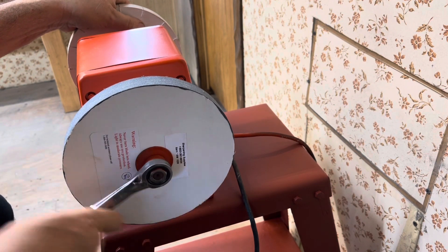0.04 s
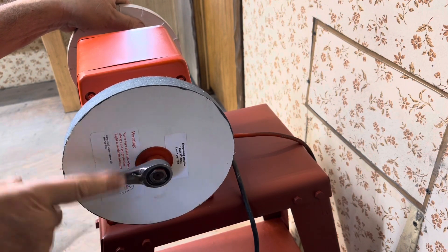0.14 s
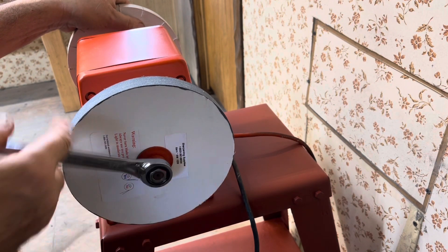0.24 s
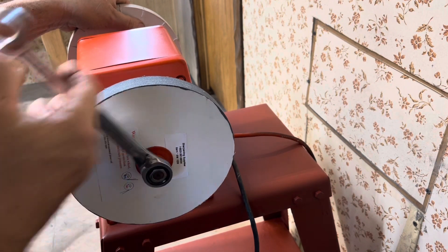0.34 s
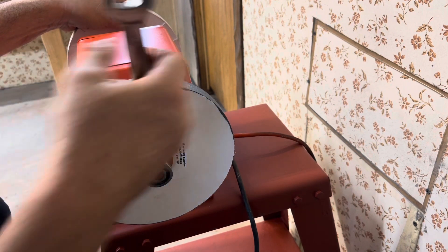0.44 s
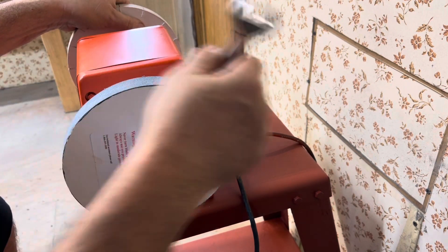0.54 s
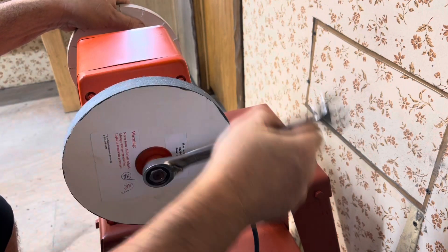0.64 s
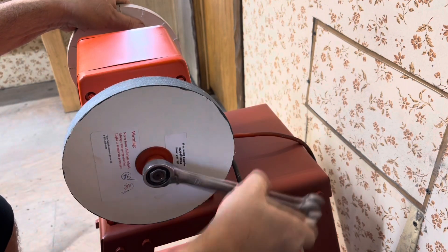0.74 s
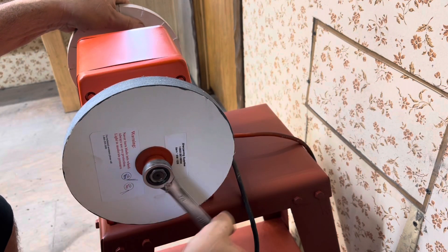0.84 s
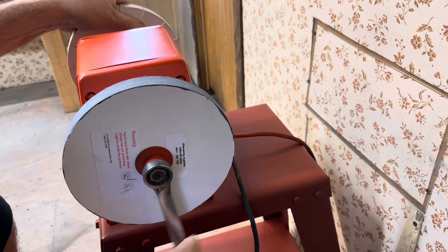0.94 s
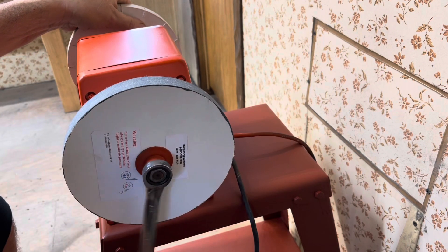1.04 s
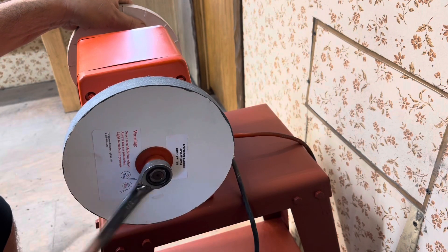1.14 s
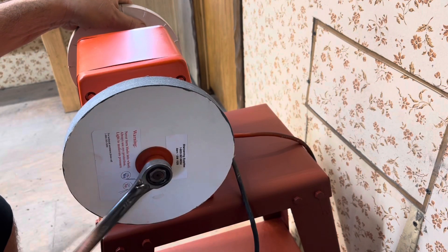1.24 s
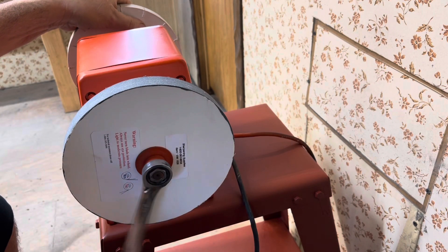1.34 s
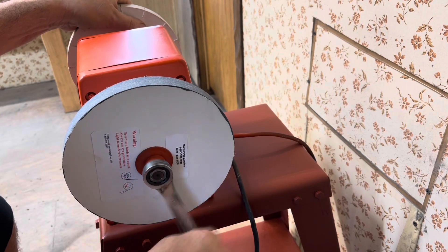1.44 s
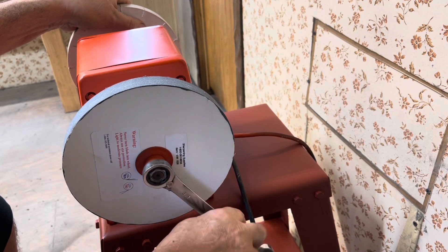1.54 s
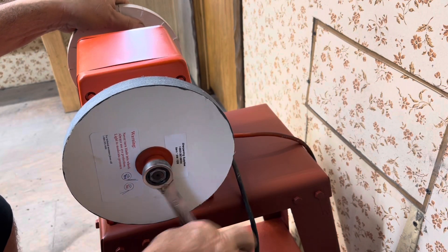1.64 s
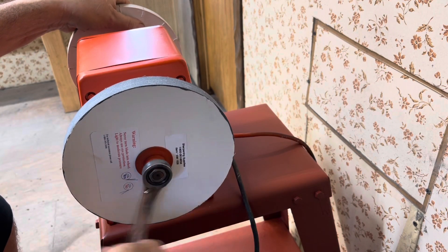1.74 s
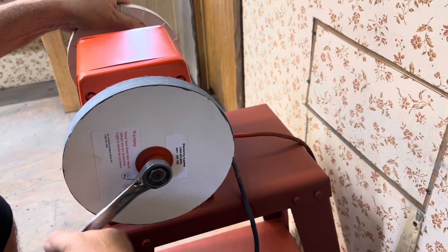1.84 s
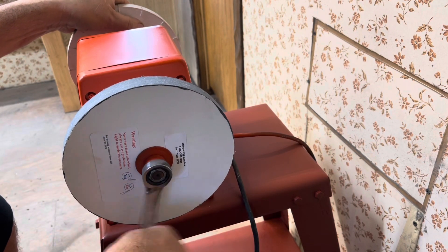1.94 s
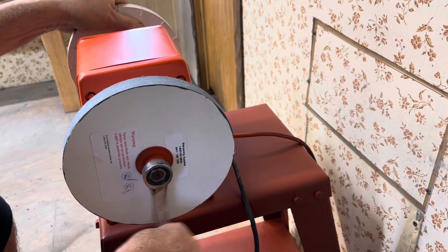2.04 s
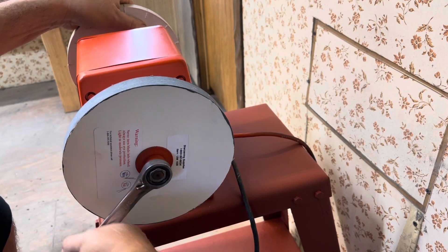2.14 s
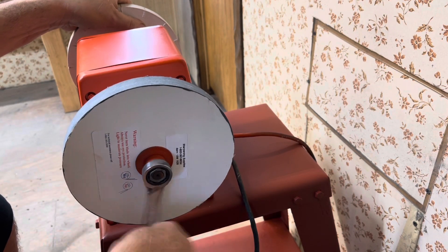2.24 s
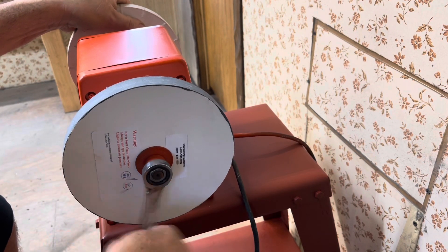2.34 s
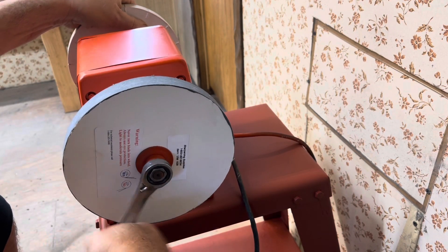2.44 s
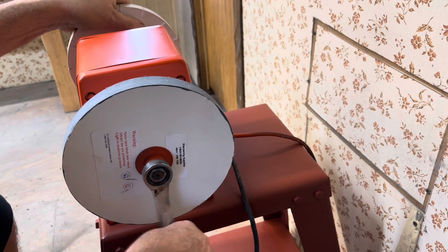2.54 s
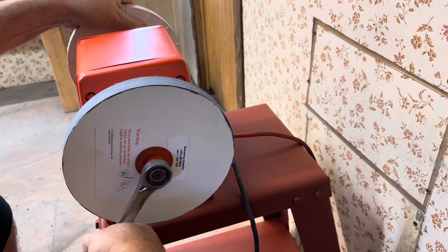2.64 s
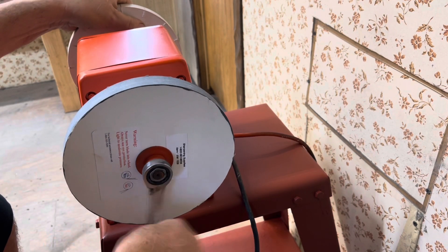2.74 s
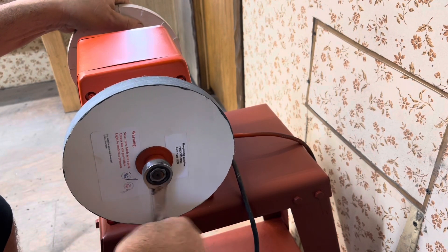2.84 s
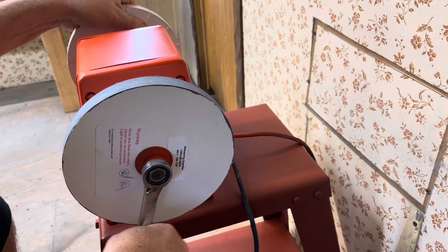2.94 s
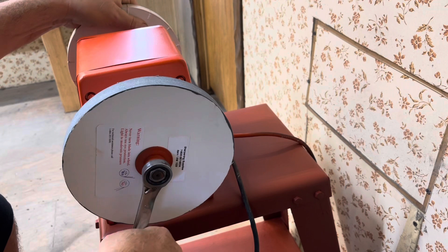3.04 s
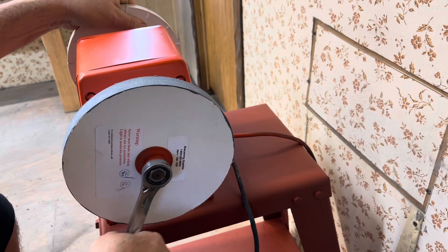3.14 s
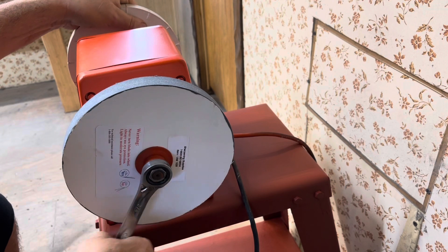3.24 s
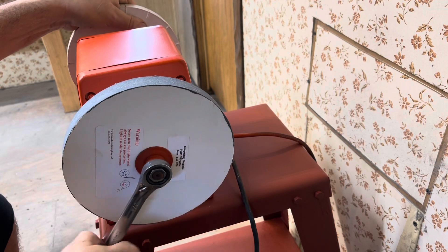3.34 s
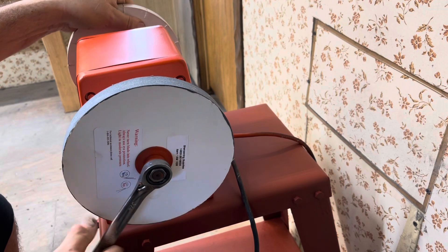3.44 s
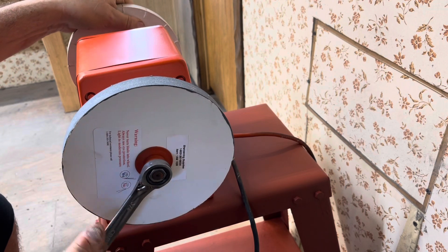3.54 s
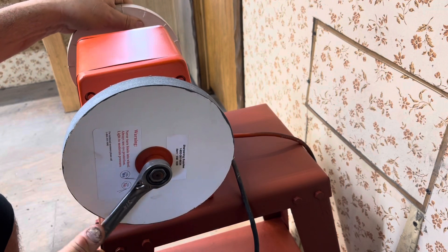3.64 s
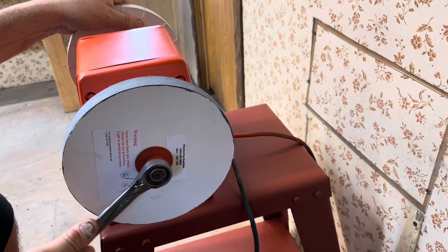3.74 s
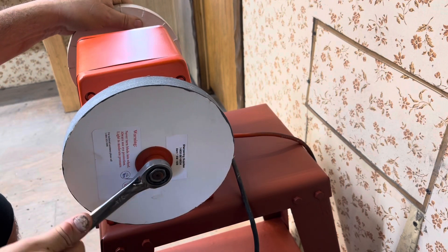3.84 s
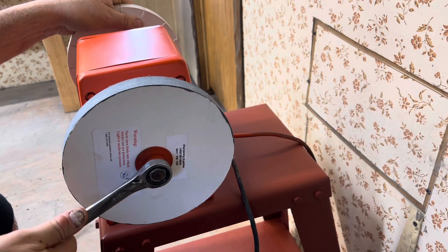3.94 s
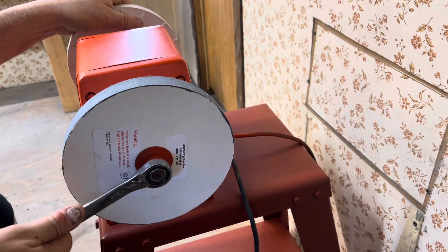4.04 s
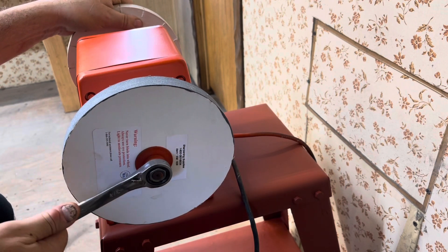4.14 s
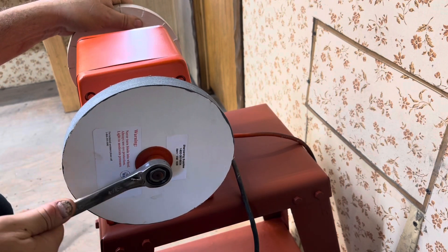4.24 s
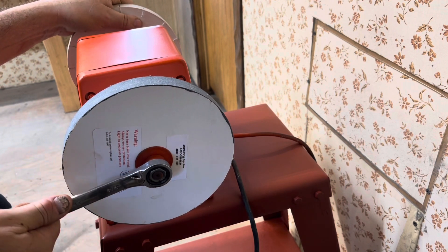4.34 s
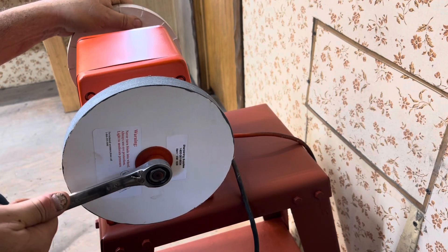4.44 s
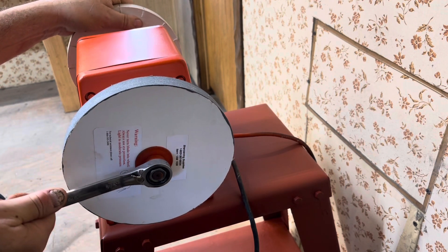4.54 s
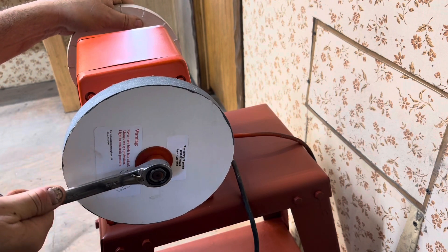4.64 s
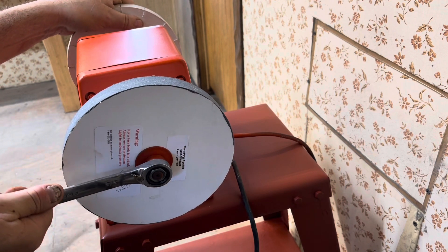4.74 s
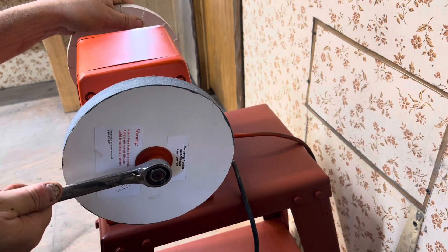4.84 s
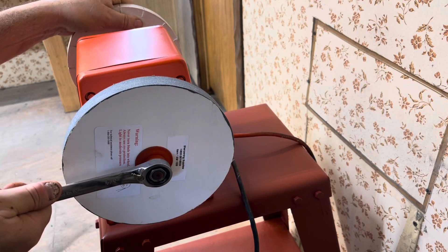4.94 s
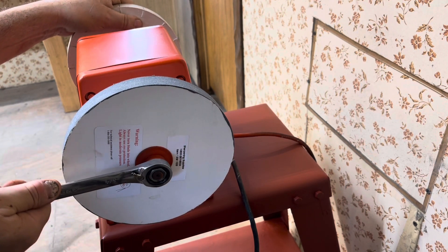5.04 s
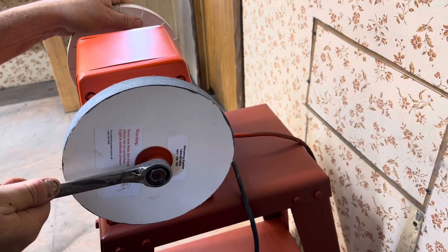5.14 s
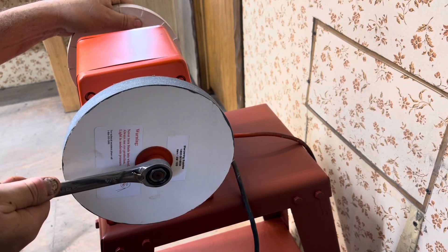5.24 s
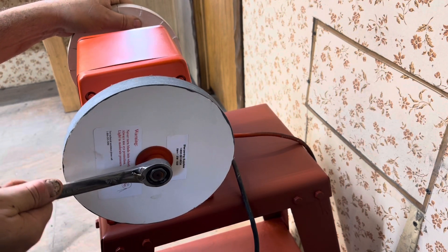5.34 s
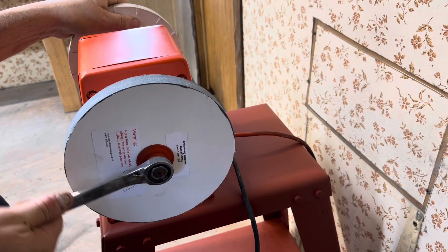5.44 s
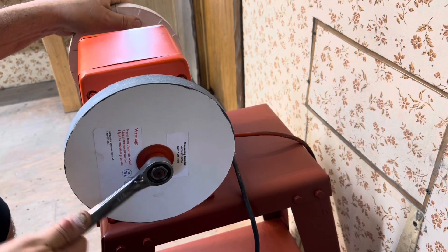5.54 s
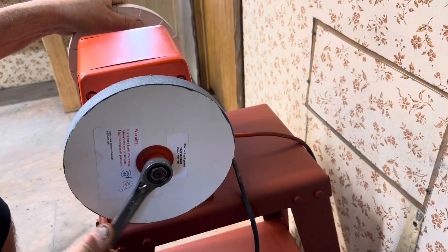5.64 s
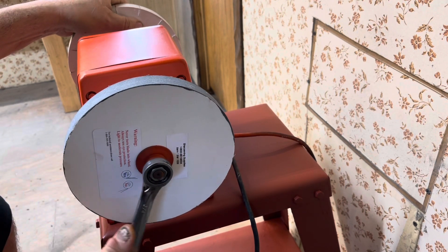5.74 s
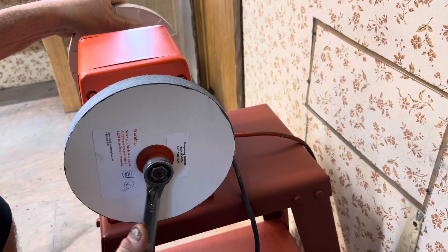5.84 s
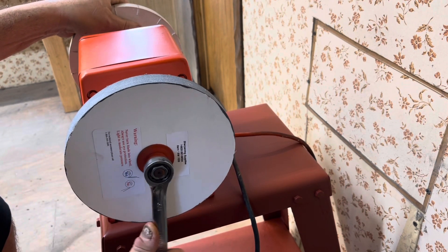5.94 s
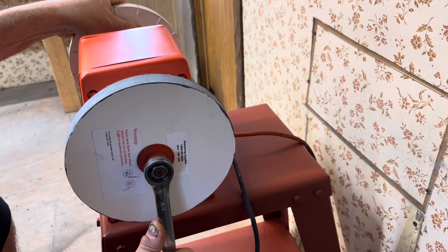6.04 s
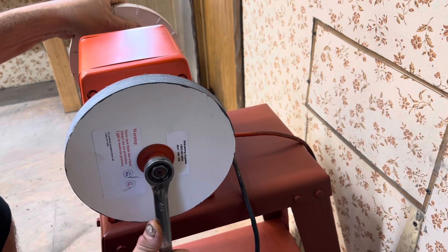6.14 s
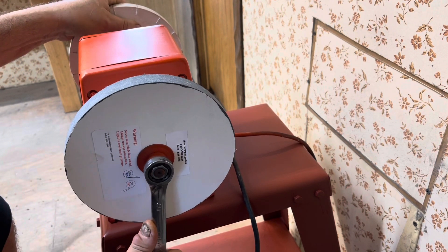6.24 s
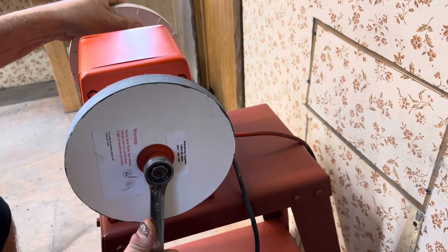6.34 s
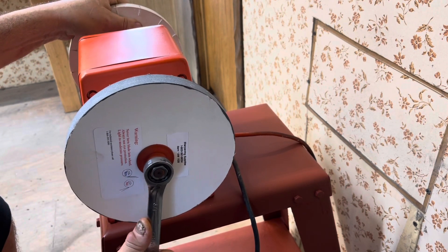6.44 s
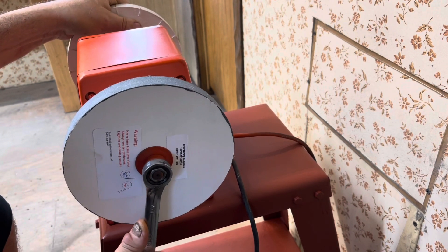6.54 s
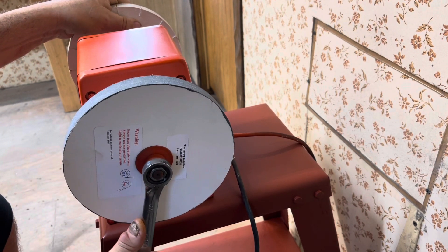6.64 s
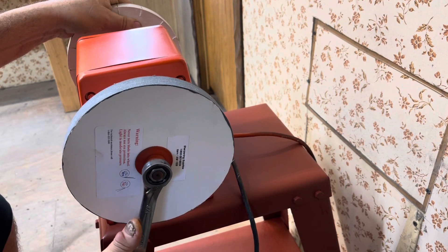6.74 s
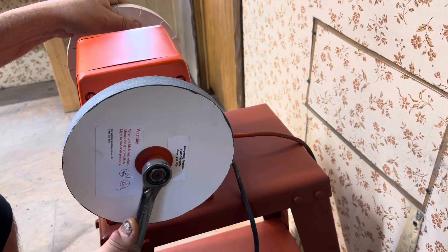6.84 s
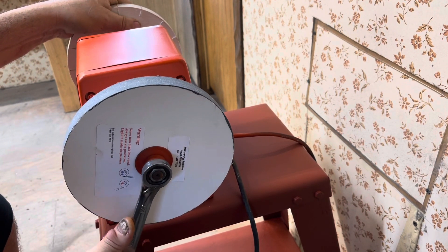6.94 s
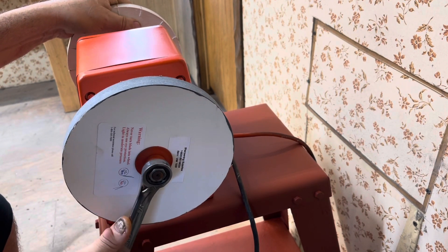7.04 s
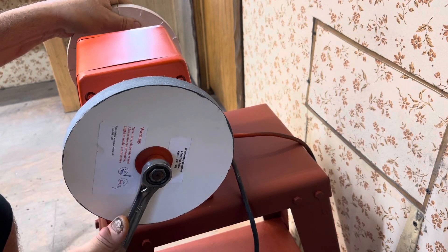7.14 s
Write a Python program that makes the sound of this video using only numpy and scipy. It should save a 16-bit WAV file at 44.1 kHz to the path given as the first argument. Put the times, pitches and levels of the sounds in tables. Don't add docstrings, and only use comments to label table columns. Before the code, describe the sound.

Five fast ratchet swings snap and scrape against a thumping metal stand, followed by near quiet and one slower, ringing run of separate clicks.

```python
import sys
import numpy as np
from scipy import signal
from scipy.fft import rfft, irfft, next_fast_len
from scipy.io import wavfile
from scipy.ndimage import uniform_filter1d

SR = 44100
rng = np.random.default_rng(int(sys.argv[2]) if len(sys.argv) > 2 else 0)


def volts_from_db(level):
    exponent = np.asarray(level, float) / 20
    return 10 ** exponent


def pcm_store(signal):
    levels = np.round(np.clip(np.atleast_2d(signal), -1, 1) * 32767)
    wavfile.write(sys.argv[1], SR, levels.astype(np.int16).T)


N = 316638

# centre_hz, width_hz, level_db
FRAME_RINGS = [(532, 57, -3), (610, 68, -2), (704.6, 40, -3.5), (890.7, 91, -2.5), (1035, 130, -7),
               (1240, 150, -12), (1400, 77, -8.5), (1650, 67, -15.5)]
# centre_hz, width_hz, level_db
SHELF_RINGS = [(263, 83, -5.5), (331, 50, 0.5), (402.4, 59, -3)]
# start_s, shelf_shake_db, frame_minus_shelf_db, sway_db (under 200 Hz), scrape_db
PULLS = [(0.0, -50.5, -10.5, -40.5, -65), (0.288, -49, -16, -47, -62.5), (0.79, -53, -19.5, -43, -70),
         (1.0, -59.5, -10, -49.5, -59.5), (1.27, -44.5, -12, -46, -61.5), (1.325, -45, -14, -42, -42.5),
         (1.47, -47, -2.5, -52.5, -41.5), (1.625, -39.5, -21.5, -48, -49), (1.9, -41.5, -8.5, -46.5, -43),
         (2.05, -42.5, -1.5, -50, -44.5), (2.208, -37.5, -1.5, -40, -39.5), (2.349, -42, -5, -43, -45.5),
         (2.49, -41.5, 4.5, -41, -45.5), (2.58, -49, 1.5, -40, -55), (2.74, -43.5, 9.5, -41, -45.5),
         (2.848, -44.5, 0, -33, -54.5), (5.404, -66, 6.5, -52, -65), (5.505, -50, 12, -35, -47.5),
         (5.62, -54.5, 14, -50.5, -44.5), (5.76, -57, 14, -55, -42.5), (5.93, -56.5, 12, -43.5, -38),
         (6.07, -61.5, 13, -49.5, -48), (6.57, -68.5, -23, -40.5, -72), (6.7, -58, -2, -43, -63.5),
         (6.76, -61, -27, -51, -64), (7.05, -67, -14, -53, -72)]
# centre_hz, width_hz, level_db
FIRM_RINGS = [
    [(6760, 780, -12), (7180, 210, -10.5), (8960, 1100, -3.5), (10185, 680, -3), (11260, 1100, 2), (11900, 790, -17)],
    [(1970, 1600, -6.5), (2390, 210, 7), (2980, 130, 0), (3020, 160, -2)],
]
# start_s, head_db, second_contact_ms (negative = pawl touches first), second_minus_snap_db,
# body_db (wheel and handle off the swing's rule)
SLOW_SWING = [(5.5009, -4, 3.5, -12, -4.5), (5.5174, -6.5, 4.0, -9.5, 1), (5.536, -7.0, 1.7, -6.5, 1.5),
              (5.5541, -5, 3.8, -8, 0), (5.5733, -8, 3.6, -6, 3.5), (5.5933, -8.0, 3.7, -2, 3.5),
              (5.6139, -5.0, 3.7, -4.5, -3.5), (5.6361, -3, 3.6, -7, -3), (5.6604, -5, 3.7, -5, -1.5),
              (5.6851, -10, 3.7, -3, 1.5), (5.7146, -8.5, 1.7, -4.5, 1), (5.7501, -9.0, 1.4, -3, 3.5),
              (5.7934, -7, 1.6, -1, -1), (5.8519, -6, 3.5, -10, 2), (5.91, -4.5, 3.0, -15, -1.5),
              (5.9573, -10.5, 1.9, -9.5, 5), (6.0287, -6.5, 3.7, -14.5, 4)]


def at(table, hz, column=1):
    table = np.array(table)
    return np.interp(np.log(hz + 1), np.log(table[:, 0] + 1), table[:, column])


def level(x, db):
    return x * volts_from_db(db) / np.sqrt(np.mean(x ** 2))


def band(x, hz, width):
    return signal.lfilter(*signal.iirpeak(hz, hz / width, fs=SR), x)


def two_bands(x, hz, width):
    return band(band(x, hz, width), hz, width)


def body(x, modes):
    return sum((-1) ** k * volts_from_db(db) * band(x, hz, width) for k, (hz, width, db) in enumerate(modes))


def walk(rate):
    hold = int(SR / rate)
    steps = np.repeat(rng.standard_normal(N // hold + 1), hold)
    return 2.0 * uniform_filter1d(uniform_filter1d(steps, hold), hold)[:N]


def swells(s, db, rise, fall, hold=0, rest_db=-115):
    t = np.arange(0, N / SR, .002)[:, None]
    each = db - rise * np.clip(s - t, 0, None) - fall * np.clip(t - s - hold, 0, None)
    return np.interp(np.arange(N) / SR, t[:, 0], np.maximum(each.max(axis=1), rest_db))


def bursts(times, db, shapes, size=N):
    out = np.zeros(size + shapes.shape[1])
    for s, d, shape in zip(times, db, shapes):
        first = int(s * SR)
        out[first:first + len(shape)] += volts_from_db(d) * shape
    return out[:size]


def hiss(db, hz, width):
    return volts_from_db(db) * level(two_bands(rng.standard_normal(N), hz, width), 0)


def air():
    # frequency_hz, density_db (per Hz)
    air_colour = [(15, -57.5), (25, -18.5), (42, -4), (95, 1.5), (148, -11), (203, -25), (231, -13.5),
                  (325, -19.5), (351, -28), (548, -21), (641, -25.5), (1330, -44), (2310, -47.5),
                  (2630, -59), (13000, -58.5)]
    out, swell, f = 0, walk(0.31), np.fft.rfftfreq(N, 1 / SR)
    colour = rfft(rng.standard_normal((2, N))) * volts_from_db(at(air_colour, f))
    for hz in 30 * 2 ** np.arange(0, 9.1, 1):
        octave = np.clip(1 - np.abs(np.log2(f / hz + 1e-9)), 0, 1)
        out = out + irfft(colour * octave, N) * volts_from_db(swell + 1.5 * walk(8))
    mid, side = out
    side = signal.lfilter(*signal.butter(1, 500, "high", fs=SR), side)
    return volts_from_db(-53) / mid.std() * np.array([mid + 0.26 * side, mid - 0.6 * side])


def room(x):
    # centre_hz, t60_s, level_db
    decays = [(102, 0.77, -13.5), (506, 0.56, 4.5), (2160, 0.39, 0), (2770, 0.58, -4), (4623, .45, -5),
              (7400, 0.56, -7), (11900, 0.25, -9)]
    size = SR
    t, f = np.arange(size) / SR, np.fft.rfftfreq(size, 1 / SR)
    noise, tail = rfft(rng.standard_normal((2, size))), 0
    alike = 1 / (1 + (f / 520) ** 2)
    noise[1] = alike * noise[0] + np.sqrt(1 - alike ** 2) * noise[1]
    for k, (hz, t60, db) in enumerate(decays):
        share = at(np.c_[np.array(decays)[:, 0], np.eye(len(decays))[k]], f)
        fade = volts_from_db(db - 60 * t / t60) * np.sqrt(2 * np.log(1000) / t60 / SR)
        tail = tail + irfft(noise * share, size) * fade
    onset = np.clip((t - .002) / 0.002, 0, 1)
    return signal.fftconvolve(x[None], tail * onset, axes=1)[:, :N]


def whine():
    # time_s, level_db
    whine_level = [(0, -67), (1.3, -70), (2.9, -69.5), (3.25, -72), (3.42, -100), (6.2, -100), (6.3, -79),
                   (6.9, -82), (7.18, -83.5)]
    t = np.arange(N) / SR
    return hiss(np.interp(t, *np.transpose(whine_level)), 9060, 500) + hiss(-94.5, 7800, 500) + hiss(-93, 2500, 110)


def squeak():
    # start_s, level_db, hold_s, pitch_hz, width_hz
    s, db, hold, hz, width = (4.5, -96, .16, 3700, 60)
    return hiss(swells(s, db, 400, 400, hold), hz, width)


def stand():
    # centre_hz, width_hz, level_db
    sway_rings = [(44.5, 16, -3), (64.6, 11, -0.5), (93, 12, -2), (140, 40, -3)]
    # start_s, peak_db, ring_hz, t60_s
    knocks = [(0.281, -40, 61, 0.19), (0.447, -32, 140, 0.1), (0.782, -35, 140, 0.33),
              (1.288, -38, 353.5, 0.12), (1.62, -30.5, 146, 0.34), (1.739, -32.5, 147, 0.15),
              (1.883, -37.5, 413, 0.098), (2.359, -28.5, 408, 0.091), (2.459, -32.5, 393, 0.1),
              (2.579, -42, 542, 0.17), (2.789, -49, 596, 0.12), (2.849, -45, 553, 0.13),
              (2.884, -22, 143, 0.047), (5.447, -41.5, 623, 0.12), (5.495, -28.5, 52.2, 0.42),
              (5.5, -36.5, 100.1, 0.12), (5.922, -27.5, 48, 0.19), (6.09, -34.5, 48.4, 0.23),
              (6.394, -38, 88.3, 0.1), (6.568, -15.5, 136.6, 0.11), (6.569, -34, 230.7, 0.07),
              (6.619, -25, 64.6, 0.18), (6.719, -26, 125, 0.11)]
    s, shelf, frame, sway, _ = np.transpose(PULLS)
    shelf_db = swells(s, shelf, rise=599.5, fall=112, rest_db=-71.5)
    frame_db = swells(s, shelf + frame, rise=599.5, fall=112, rest_db=-78.5)
    sway_db = swells(s, sway, rise=300, fall=111, rest_db=-60.5)
    slips = rng.standard_normal(N) * volts_from_db(1.9 * walk(60))
    shaking = volts_from_db(shelf_db) * level(body(slips, SHELF_RINGS), -2.0)
    shaking += volts_from_db(frame_db) * level(body(slips, FRAME_RINGS), -1.5)
    swaying = volts_from_db(sway_db) * level(body(band(rng.standard_normal(N), 60, 220), sway_rings), 0)
    s, db, hz, t60 = (c[:, None] for c in np.transpose(knocks))
    t = np.arange(8192) / SR
    rings = np.sin(2 * np.pi * hz * t) * (1 - np.exp(-t / 0.0071)) * volts_from_db(-60 * t / np.clip(t60, .02, .3))
    return shaking + swaying + bursts(s[:, 0], db[:, 0], rings)


def thumps():
    # start_s, frame_db, shelf_db
    catches = [(1.883, -20, -21), (2.319, -15, -21.5), (2.345, -15.5, -19.5), (2.357, -20.5, -12.5),
               (2.579, -8.5, -21), (2.709, -19.5, -27), (2.745, -12, -22.5), (2.85, -10.5, -18.5),
               (5.401, -21.5, -33), (5.445, -18, -27), (6.57, -39, -22.5), (6.715, -42, -31)]
    s, frame_db, shelf_db = np.transpose(catches)
    t = np.arange(128) / SR * 1000 / 0.18
    push = np.tile(t * np.exp(1 - t), (len(s), 1))
    return volts_from_db(1.0) * (body(bursts(s, frame_db, push), FRAME_RINGS) + body(bursts(s, shelf_db, push), SHELF_RINGS))


def ticks():
    # start_s, peak_db, dull_minus_peak_db, length_ms
    touches = [(0.287, -15, -24, 1.77), (0.439, -76.5, 17.5, 6.4), (0.495, -77, 19, 17),
               (0.628, -45, -18.5, 19), (0.7492, -60, -5.5, 12), (0.8, -52, -23, 2.7),
               (0.994, -52, 11.5, 9.6), (1.2423, -66.5, 16.5, 3.1), (1.285, -65.5, 17.5, 2.7),
               (2.1696, -14.5, -41, 6.2), (2.34, -40, -9.5, 2), (2.36, -40, -8.5, 2),
               (2.441, -24.5, -9.5, 3.2), (2.455, -58, 18.5, 6), (2.6993, -22.5, -16.5, 7.9),
               (3.4598, -57, -18, 8.7), (4.0095, -58, -24, 3.34), (4.685, -66, -9, 2.83),
               (5.335, -65, -26.5, 13), (5.37, -87, 5.5, 3.4), (5.398, -62.5, 10.5, 5.8),
               (5.446, -53.5, 16.5, 7.1), (6.29, -62, 6, 4), (6.574, -54.5, -22, 11.4), (6.695, -69, -3, 9),
               (6.74, -60, -0.5, 12), (6.85, -43, -24, 2.2), (7.053, -76.5, -4, 6.4)]
    s, db, dull_db, ms = np.transpose(touches)
    t = np.arange(1024) / SR
    shapes = rng.standard_normal((len(s), len(t))) * np.exp(-1000 * t / np.clip(ms, .3, 14)[:, None])
    bright = volts_from_db(-9.0) * two_bands(bursts(s, db, shapes), 6500, 11000)
    dull = volts_from_db(6.5) * two_bands(bursts(s, db + dull_db, shapes), 2300, 3800)
    return bright + dull


def fingers():
    # start_s, level_db, hold_s, fall_db_per_s
    brushes = [(0.0, -81, 0.056, 200), (0.207, -87, .07, 300), (0.294, -58.5, 0.0013, 197),
               (0.61, -80, 0.033, 202), (0.734, -79.5, 0.058, 302), (0.9, -78.5, .2, 602),
               (1.29, -83, 0.0079, 198), (3.347, -92, 0.00094, 401.5), (3.459, -88.5, .001, 76),
               (3.6, -99, .15, 129), (4.041, -97.5, .001, 100), (4.24, -100, .001, 21),
               (4.686, -92.5, .001, 300), (5.367, -79, .001, 301), (5.47, -76.5, 0.0068, 507),
               (6.3, -85, .001, 73.5), (6.545, -75, 0.00094, 339), (6.72, -69.5, .001, 283),
               (6.853, -76, .001, 633), (6.892, -95, 0.00087, 27.5)]
    s, db, hold, fall = np.transpose(brushes)
    return hiss(swells(s, db, 1498.5, fall, hold) + 7.5 + 2.9 * walk(41), 10200, 2600)


def dip(x):
    x = x - .86 * band(x, 3520, 1400)
    return x - 0.45 * band(x, 5420, 540)


def scrape():
    s, *_, rub = np.transpose(PULLS)
    scrape_db = np.minimum(swells(s, rub, rise=902, fall=77), -51)
    grit_db = 2.5 * walk(30)
    rubbing = hiss(scrape_db - 3.0 + grit_db, 2400, 2200)
    return np.where(np.arange(N) / SR < SLOW_SWING[0][0], rubbing, dip(rubbing))


def head(low_db, middle_db, top_hz, top_db, flank_db):
    rings = np.array(FIRM_RINGS[0])
    hz = np.r_[rings[:4, 0], top_hz, rings[5, 0]]
    db = rings[:, 2] + [low_db, low_db, middle_db, 0, top_db, flank_db]
    return np.c_[hz, rings[:, 1], db]


def contacts(teeth, snap, second):
    s, db, ms, second_db, body_db = np.transpose(teeth)
    done = (s - s[0]) / (s[-1] - s[0])
    chance = 1.2 * rng.standard_normal((len(s), 2)).T
    snaps = np.c_[s, db, snap[0] + snap[2] * done + body_db, snap[1] + body_db]
    seconds = np.c_[s + ms / 1000, db + second_db,
                    second[0] + body_db + chance[0], second[1] + body_db + chance[1]]
    return np.r_[snaps, seconds]


def pawl(snaps, head_modes, wheel_modes, handle_modes, crack_db, body_grit):
    s, head_db, wheel_db, handle_db = np.transpose(snaps)
    start = int(s.min() * SR)
    s, size = s - start / SR, min(N - start, 2 * SR)
    t = np.arange(384) / SR
    f = np.fft.rfftfreq(len(t), 1 / SR)
    tooth = irfft(np.exp(-2j * np.pi * (.0011 * f - .0011 * f ** 2 / SR)), len(t))
    grit = rng.standard_normal((len(s), len(t))) * (t > .0004)
    crisp = tooth + .13 * grit * np.exp(-t / .0012)
    drawn = tooth + body_grit * grit * np.exp(-t / 0.0031)
    wheel = volts_from_db(27) * body(bursts(s, head_db + wheel_db, drawn, size), wheel_modes)
    handle = volts_from_db(23.0) * body(bursts(s, head_db + handle_db, drawn, size), handle_modes)
    crack = volts_from_db(crack_db) * band(bursts(s, head_db, drawn, size), 2500, 7500)
    blow = bursts(s, head_db, crisp, size)
    hz, width, db = head_modes[4]
    top = volts_from_db(db + 2.0) * two_bands(blow, hz, 1.3 * width) - volts_from_db(db) * band(blow, hz, width)
    rung = volts_from_db(23.5) * (body(blow, head_modes) + top) + wheel + handle + crack
    return np.pad(rung, (start, N - start - size))


def wrench():
    swing_1 = [(1.314, -9.5, 2.5, -1.5, 1.5), (1.3311, -5.5, -1.95, -5.5, -2.5), (1.345, -5, -5, -4.5, 1),
               (1.3575, -10, -3.5, -3.5, 2), (1.3673, -7, 1.7, -1.5, 1.5), (1.381, -5.5, -1.5, -6.5, -2.5),
               (1.3921, -4.5, 0.5, -9.5, -2.5), (1.4031, -6, 2, -11.5, -5), (1.4138, -14, -2, -3, 4),
               (1.4247, -9.5, 0.5, -4, 3.5), (1.4364, -8.0, -3.7, -10.5, 0.5), (1.45, -12, 1, -8, 1.5),
               (1.4649, -8.5, 4, -6.5, -1), (1.4823, -10, 1.2, -2.5, -3.5), (1.5005, -14.5, 3, -7.5, 5.5),
               (1.5277, -7.5, -4.5, -8.5, -1.5)]
    swing_2 = [(1.8996, -4.5, -1.86, -10, -3.5), (1.9022, -11, 1.5, -3, -2), (1.9098, -5, 3.8, -9, -3.5),
               (1.9196, -12, 3.5, -5, 4), (1.93, -9, 2, -8, 1.5), (1.9376, -7.5, -3.5, -6.5, 4.5),
               (1.9452, -7, -1.4, -8.5, .5), (1.954, -8, -3, -10, -.5), (1.9635, -8.5, -2, -12, -2),
               (1.9715, -9, -2.9, -9.5, 1), (1.9833, -12.5, 1.5, -8.5, 3), (2.0007, -13.5, 5, -8.5, -.5)]
    swing_3 = [(2.2167, -7.0, -2.14, -1.5, -1), (2.2259, -2.5, 3.9, -5.5, -2.5),
               (2.2358, -7, -1.5, -9.5, 4.5), (2.2452, -5.0, 3, -13, 0.5), (2.2519, -8.0, -3.5, -11, 1.5),
               (2.2592, -11.0, 4, -7.5, 1.5), (2.2677, -8, -1.96, -14, -4.5),
               (2.2785, -10, 2.2, -8.5, -1.5)]
    swing_4 = [(2.4799, -7, 3.2, -11, -1.5), (2.4905, -12.0, 2.16, -4.5, 5), (2.5015, -7.0, 2.2, -10, -2),
               (2.5115, -9.5, 1.8, -2, -2.5), (2.5211, -11.0, 3.4, -11, 3), (2.5325, -12, 3.2, -8.5, 0.5)]
    swing_5 = [(2.7337, -5, 4.5, -10.5, 0), (2.7467, -6.5, 1.5, -5.5, -1.5), (2.7572, -11, -1.3, -2, 3),
               (2.7662, -5.5, 2, -9.5, -1), (2.778, -12.5, -1.7, -2.5, -0.5), (2.7936, -6, -3, -7, -1)]
    # wheel_db, handle_db, wheel_gain_over_swing_db
    snap_parts = [
        (-21.5, -25, 1.5),
        (-21.5, -28, -1),
        (-22.5, -24, 3.5),
        (-19, -22, 5),
        (-16.5, -18, 0.5),
        (-17, -7.5, 5.5),
    ]
    # wheel_db, handle_db
    second_parts = [
        (-17.5, -18),
        (-21.5, -26.5),
        (-21.5, -22.5),
        (-14, -23),
        (-19, -25.5),
        (-25.5, -12),
    ]
    # centre_hz, width_hz, level_db
    wheel_1 = [(3400, 99, -2.5), (4390, 200, 4.5), (4750, 390, -5.5), (5760, 410, -10)]
    wheel_2 = [(4138, 170, 0), (4650, 160, 2.5), (5020, 390, -5.5), (5600, 250, -2.5)]
    wheel_3 = [(3520, 420, -6.5), (4500, 110, 5.5), (4780, 630, -3), (5890, 350, 2.5)]
    wheel_4 = [(3310, 150, -7.5), (4110, 110, 4.5), (4730, 300, 1), (5740, 590, -4.5)]
    wheel_5 = [(4060, 150, -8), (4730, 250, 6.5), (5200, 67, -3), (5840, 350, -7.5)]
    # low_db, middle_db, top_hz, top_db, flank_db
    head_colours = [
        (-2, 1, 11250, -1, -5),
        (-2, 0.5, 11050, -0.5, -3),
        (-1, -1, 9600, 1.5, -2),
        (-0.5, 2, 11500, -0.5, -2.5),
        (2.5, 0.5, 11250, -0.5, -3.5),
    ]
    # centre_hz, width_hz, level_db
    loose_rings = [
        [(6400, 510, -9.5), (7360, 280, -10), (8650, 2000, -5.5), (10500, 520, -1.5), (11160, 1200, 1), (11100, 750, -13)],
        [(4230, 460, -14), (4360, 87, -9.5), (4740, 290, 6)],
        [(2020, 66, -9), (2190, 460, -2.5), (2530, 190, 6), (2760, 360, 4), (2630, 5.3, -9), (3000, 2.4, -1), (2730, 5, -4.5), (3030, 5, -9)],
    ]
    # centre_hz, width_hz, level_db
    late_handle = [(2250, 300, -7.5), (2412, 200, -0.5), (2850, 260, 5), (2610, 8, -8), (2900, 4.4, -3.5),
                   (2850, 12, 0), (3180, 150, -6)]

    swings = swing_1, swing_2, swing_3, swing_4, swing_5, SLOW_SWING
    snaps = [contacts(*swing) for swing in zip(swings, snap_parts, second_parts)]
    wheels = wheel_1, wheel_2, wheel_3, wheel_4, wheel_5
    quick = sum(pawl(rows, head(*colour), wheel, FIRM_RINGS[1], crack_db=-9, body_grit=0.26)
                for rows, colour, wheel in zip(snaps, head_colours, wheels))
    loose_head, loose_wheel, loose_handle = loose_rings
    late = snaps[-1][:, 0] > 5.73
    slow = sum(pawl(rows, loose_head, loose_wheel, handle, crack_db=-18, body_grit=0.094)
               for rows, handle in ((snaps[-1][~late], loose_handle), (snaps[-1][late], late_handle)))
    return quick + dip(signal.lfilter(*signal.butter(2, 1760, "high", fs=SR), slow))


def scene():
    near = wrench() + ticks() + stand() + thumps() + scrape() + fingers()
    return near + room(near) + whine() + air() + squeak()


def gate(x):
    # frequency_hz, harder_to_pass_db
    strictness = [(9900, 7), (10600, 0), (12000, 0), (12700, 8), (13400, 3), (14100, 0), (14800, -9),
                  (15500, -14), (16200, -4)]
    # frequency_hz, floor_db
    gate_floor = [(10000, -88), (10600, -113), (12100, -113), (12700, -88)]
    f, _, z = signal.stft(x, SR, nperseg=512)
    power = (np.abs(z[:, :256]) ** 2).mean(axis=0).reshape(32, 8, -1).sum(axis=1)
    db = 10 * np.log10(uniform_filter1d(power, size=3, axis=1) * 4 / 3 + 1e-18)
    top = db[2:].max(axis=0)
    onset = top - np.roll(top, 3) > 10
    centres = f[4:256:8, None]
    db -= at(strictness, centres)
    keep = (db > at(gate_floor, centres)) & ((db > top - 25) | onset)
    z[:, :256] *= np.repeat(keep, 8, axis=0) | (f[:256, None] < 9600)
    return signal.istft(z, SR, nperseg=512)[1][:, :N]


def roll_off(x):
    return signal.sosfilt(signal.butter(12, 16970, fs=SR, output="sos"), x)


def record(dry):
    # frequency_hz, gain_db
    mic_response = [(25, -12.5), (45, -1.5), (3100, 3), (3500, 2.5), (3900, 1), (4200, 1.5), (5000, -2),
                    (5500, 1.5), (6200, 0)]
    # frequency_hz, gain_db
    top_cut = [(12200, 0), (13200, -2), (14000, -20), (14700, -15), (15800, -17), (16600, -38)]
    # frequency_hz, left_leads_rad
    port_lead = [(0, 0), (1300, 0), (3100, 1.), (4600, .2), (6800, .1), (7900, .8), (8700, -.4),
                 (10200, -3.1), (12000, -6.3), (13700, -9.3), (15500, -12.5)]
    # frequency_hz, left_minus_right_db
    port_tilt = [(60, 0.5), (110, 0.8), (200, 2), (380, 1), (700, 2.2), (1290, 1.6), (2380, 3), (4400, 4),
                 (8120, 1), (15000, -1.5)]
    ceiling = .95
    size = next_fast_len(N + 4096)
    f = np.fft.rfftfreq(size, 1 / SR)
    left, right = rfft(dry, size)
    right += (left - right) / (1 + (7500 / (f + 1)) ** 12) / (1 + (f / 12600) ** 16)
    tilt = volts_from_db(at(port_tilt, f) / 2)
    half_cut_db = at(top_cut, f) / 2
    sides = np.array([left * tilt, right / tilt * np.exp(-1j * at(port_lead, f))])
    x = irfft(volts_from_db(at(mic_response, f) + half_cut_db) * sides, size)[:, :N] / ceiling
    rounded = rfft(ceiling * x / (1 + x ** 4) ** (1 / 4), size)
    return roll_off(gate(irfft(rounded * volts_from_db(half_cut_db), size)[:, :N]))


dry = scene()
out = record(dry)
pcm_store(out)
```